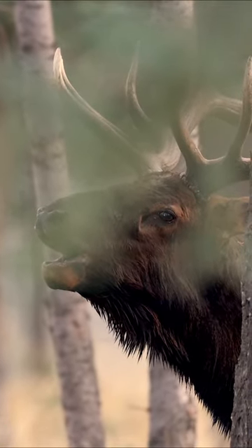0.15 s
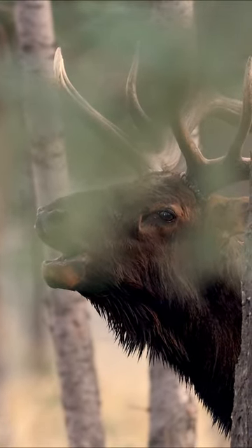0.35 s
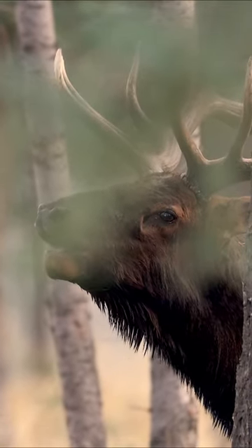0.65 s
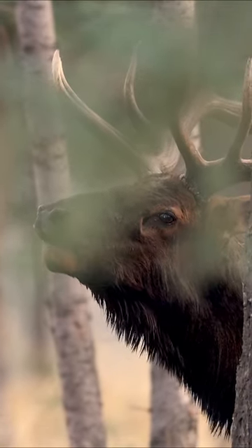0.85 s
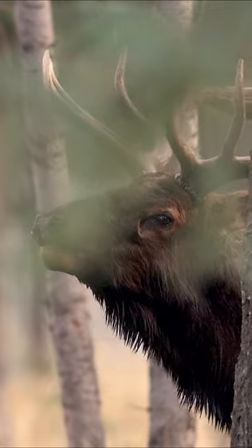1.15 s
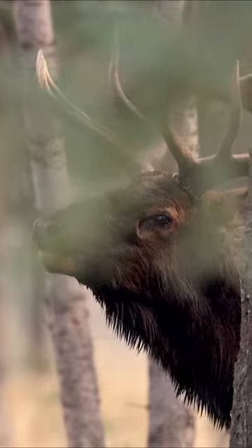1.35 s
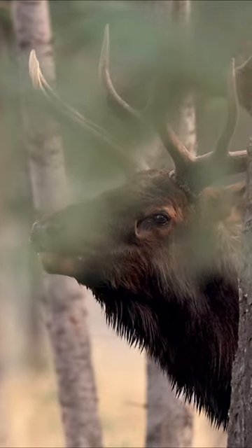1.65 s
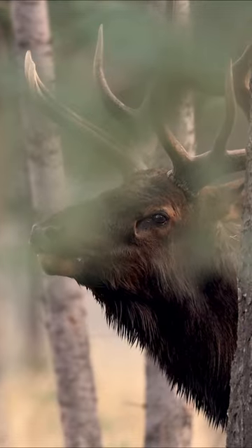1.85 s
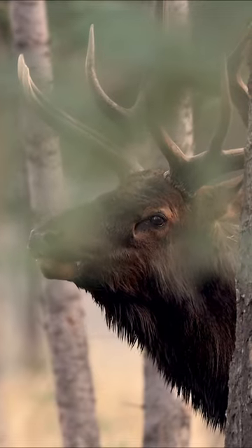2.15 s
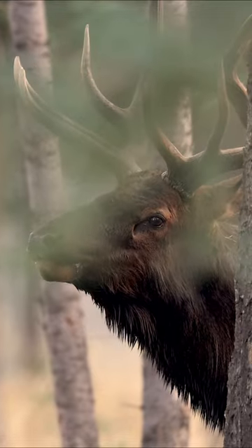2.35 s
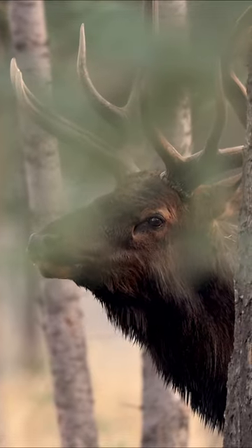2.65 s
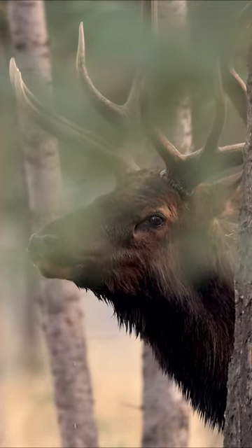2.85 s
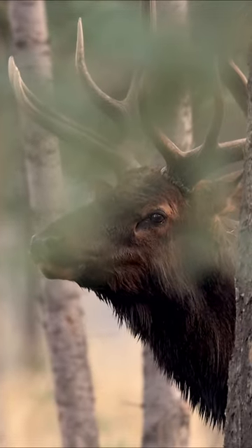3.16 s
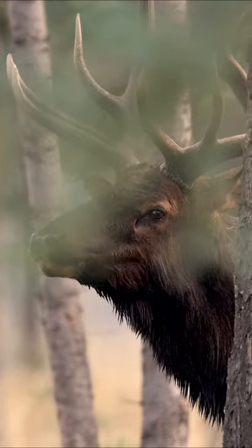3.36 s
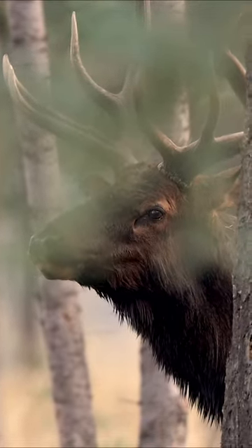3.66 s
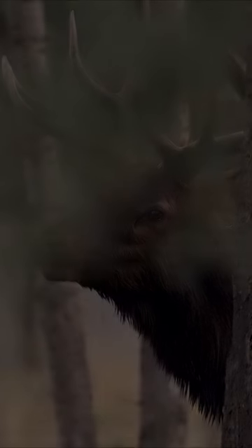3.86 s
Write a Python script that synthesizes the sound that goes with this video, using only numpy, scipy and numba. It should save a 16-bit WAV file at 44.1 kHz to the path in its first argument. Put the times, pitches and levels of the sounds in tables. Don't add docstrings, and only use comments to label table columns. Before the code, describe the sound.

Elk bugling: a near whistle drops and breaks off, then a distant call climbs into a rough scream.

```python
import sys
import numpy as np
from scipy import signal
from scipy.io import wavfile
from scipy.ndimage import uniform_filter1d
from numba import njit

SR = 44100
rng = np.random.default_rng(int(sys.argv[2]) if len(sys.argv) > 2 else 0)


def digitize_waveform(pressure):
    field = np.atleast_2d(pressure).T
    bounded = np.clip(field, -1, 1)
    quanta = np.round(bounded * 32767).astype(np.int16)
    wavfile.write(sys.argv[1], SR, quanta)


def gain_from_db(level_db):
    decades = np.asarray(level_db, float) / 20
    return 10 ** decades


N = 176400
T = np.arange(N) / SR

# (frequency [Hz], density [dB per Hz])
WIND_COLOUR = [(32, -29.5), (55, 0.5), (110, 1), (700, -8), (1250, -15), (2100, -28), (4100, -33),
               (5200, -77)]
# (time [s], level [dB], extra treble [dB])
GUSTS = [(0, 2.5, 0.5), (.6, 0.2, 3), (1.1, 0.5, 0.5), (1.5, 0, -1.5), (2.5, -.5, -1.5), (3.1, 0, -1.5),
         (3.6, 0, -3), (4, -0.5, 3)]
WIND_DB, SWELL_DB, HISS_DB = -46.5, 0.5, -74

# (time [s], pitch [Hz], level [dB])
DRONE_NOTE = [
    (0, 104.5, -59.5),
    (.7, 103, -47.5),
    (1.1, 97.9, -50),
    (1.5, 93.25, -49.5),
    (2, 90, -48.5),
    (3, 93.5, -51.5),
    (3.5, 83.7, -54.5),
    (4, 80.27, -52.5),
]
DRONE_WIDTH_HZ, DRONE_NOISE, DRONE_FLUTTER_DB = 7.9, 0.3, 1.5
HUM_HZ, HUM_WIDTH_HZ, HUM_DB = 127.6, 4.1, -57.5

# (time [s], pitch [Hz], level [dB], octave relative to it [dB])
CHEST = [(0, 152.2, -27.5, -10), (.08, 148.2, -32, -18), (.15, 142.2, -35.5, -7), (.2, 139, -44.5, 7),
         (.25, 134.4, -47.5, 11.5), (.285, 135.8, -49.5, 8), (.32, 133.8, -71.5, 9),
         (.34, 133.6, -86, -5.5)]
# (time [s], pitch [Hz], level [dB], lower sideband [dB], upper sideband [dB])
NEAR_HIGH = [(0, 1850, -31, -2.5, -15), (.02, 1680, -28, -9.5, -18.5), (.03, 1788, -37.5, 1.5, -9.5),
             (.05, 1680, -43.5, 1, -7.5), (.09, 1670, -57, -10, -2.5)]
# (time [s], pitch [Hz], level [dB], lower sideband [dB], upper sideband [dB])
NEAR_FALL = [
    (.05, 1449, -50.5, 4, -13),
    (.072, 1323, -36, -1, -17),
    (.1, 1213, -31.5, -8.5, -17.5),
    (.15, 1150, -28, -8, -15),
    (.19, 1029, -27.5, -1.5, -14),
    (.255, 955.7, -21, -13, -23),
    (.275, 883, -22, -24.5, -36.5),
    (.298, 824, -17.5, -20.5, -23.5),
    (.312, 823, -35, -29.5, -2.5),
]
# (time [s], level [dB])
NEAR_BREATH = [(0, -46), (.08, -43), (.2, -49), (.3, -48.5), (.325, -37.5), (.348, -32.5), (.356, -47),
               (.41, -57)]
# (frequency [Hz], width [Hz], level [dB])
NEAR_THROAT = [(486, 120, -6), (621, 85, -0.5), (883, 120, -1), (913, 120, -2), (1262, 78, -13),
               (1765, 79, -3.5), (2108, 45, -3), (2258, 160, -3), (3460, 270, -24.5), (6300, 900, -32.5)]
# (time [s], pitch [Hz], level [dB])
NEAR_BREAK = [(.3, 825, -41), (0.317, 712, -31), (0.331, 639, -33.5), (.346, 628, -34.5),
              (.356, 640, -45.5), (0.373, 705, -44)]
# (time [s], pitch [Hz], level [dB])
NEAR_RING = [(.318, 851.5, -43), (.33, 890, -35.5), (.348, 900, -33.5), (.356, 900, -46), (.38, 864, -55)]
# (time [s], pitch [Hz], level [dB])
GRUNT = [
    (.33, 560, -60),
    (.342, 476, -31),
    (.354, 340, -49),
    (.366, 227, -46.5),
    (.385, 170.4, -50.5),
]
HIGH_FLUTTER_DB, BREAK_OCTAVE_DB = 2.0, -19.5
HAZE_DB, HAZE_FADE_DB_PER_S = -39.5, 39.5

# (time [s], pitch [Hz], level [dB], octave relative to it [dB])
FAR_CLIMB = [
    (2.68, 890, -68, -31),
    (2.74, 898.5, -54.5, -31),
    (2.765, 987, -54, -26),
    (2.805, 976, -74, -26),
    (2.822, 1457, -53, -30.5),
    (2.842, 1470, -53.5, -31),
    (2.852, 1714, -57, -25),
    (2.876, 1803, -48, -26),
    (2.9, 1780, -70, -30),
]
# (time [s], pitch [Hz], level [dB], octave relative to it [dB])
FAR_HOLD = [(2.9, 1980, -69, 0), (2.93, 2048, -56.5, -20), (2.985, 2030, -51, -15.5),
            (3.055, 2061, -54, -7), (3.085, 2031, -65.5, -5), (3.13, 2024, -59.5, 5),
            (3.165, 2010, -55, -10), (3.225, 2015, -55.5, -14.5), (3.3, 2015, -74, -9)]
# (time [s], upper line [dB], lower line [dB], octave upper line [dB], octave lower line [dB])
FAR_SIDES = [(3.085, -73, -70, -83, -75), (3.1, -65, -63, -82, -71), (3.15, -59.5, -67, -73, -74),
             (3.19, -63.5, -69, -77, -71), (3.28, -71, -70.5, -85, -73.5)]
FAR_SIDE_HZ = 209

# (time [s], throb rate [Hz], level [dB], upper resonances [dB])
SCREAM = [(3.163, 94.95, -75, -8.5), (3.176, 94.64, -33.5, -10.5), (3.255, 90.15, -38, -1.5),
          (3.275, 86, -35.5, -2), (3.5, 82.6, -36, -3.5), (3.55, 84.7, -39.5, -0.5), (3.7, 87.94, -36.5, 4),
          (3.74, 88, -41.5, 5.5), (4, 91.1, -42, 3)]
# (time [s], peak level [dB])
THROBS = [(3.1779, -36.5), (3.187, -30), (3.1948, -31), (3.2117, -30), (3.2395, -35.5), (3.27, -27.5),
          (3.2918, -28.5), (3.3259, -26), (3.338, -26.5), (3.347, -26), (3.3624, -28.5), (3.3725, -27),
          (3.3983, -25.5), (3.4217, -26.5), (3.4335, -27), (3.4583, -29), (3.484, -26.5), (3.4934, -25),
          (3.519, -28), (3.5436, -29.5), (3.566, -27), (3.577, -32), (3.6018, -26.5), (3.6482, -31.5),
          (3.6737, -28), (3.693, -29), (3.7143, -34), (3.7402, -35.5), (3.7724, -34.5), (3.7942, -31.5),
          (3.8179, -37), (3.8292, -34), (3.8536, -37.5), (3.8864, -37), (3.8965, -32.5), (3.9273, -35.5),
          (3.9487, -31), (3.9716, -33), (3.9844, -31)]
# (time [s], depth [0-1], phase flip per throb [half turns])
CHOKE = [(3.16, 0.8, 0.099), (3.25, 0.5, 0), (3.27, 0.84, 0.75), (3.31, 0.7, .8), (3.33, 0.97, 0.0056),
         (3.38, 0.97, 0.024), (3.4, 0.93, 0.99), (3.46, 0.6, 0.93), (3.475, 0.84, 0.0084),
         (3.51, 0.65, 0.025), (3.55, 1, 0.816), (3.62, 1, 0.34), (3.75, 0.8, .1), (4, 0.9, .2)]
# (frequency [Hz], width [Hz], level [dB])
FAR_THROAT = [(1422, 32, -18), (1715, 100, -5.5), (1920, 77, -16), (2102, 120, -6), (2308, 104, -14),
              (2380, 140, -19)]
# (frequency [Hz], width [Hz], level [dB])
FAR_RASP = [(900, 200, -20.5), (3196, 260, -31), (3910, 390, -32)]
THROB_LEAD_S = 0.002
WEAK_THROB_DB, SCREAM_SHIMMER_DB = 5, 1.5
SCREAM_HZ, SCREAM_WOBBLE = 1742, 0.0039
SCREAM_SLIP = 0.57
SCREAM_NOISE, RING_WANDER_DB, FAR_EDGE_HZ = 1.5, 1.0, 2340
RASP_SHIFT_DB_PER_S = 12.5

# (time [s], pitch [Hz], level [dB])
FAR_CHEST = [
    (3.78, 263, -66),
    (3.85, 273.8, -50.5),
    (4, 257, -61),
]
# (time [s], pitch [Hz], level [dB])
FAR_CHEST_OCTAVE = [
    (3.74, 532.4, -68),
    (3.84, 538, -54.5),
    (4, 546.6, -61),
]

WOOD_T60_S, WOOD_DB, WOOD_DELAY_S, WOOD_HZ = 0.31, -17.5, 0.02, 4550
FAR_WOOD_DB = -12
TOP_HZ = 15700


def level(x):
    return x / np.sqrt(np.mean(x ** 2))


def columns(rows):
    a = np.array(rows, float)
    inside = 1. * ((T >= a[0, 0]) & (T <= a[-1, 0]))
    gate = uniform_filter1d(inside, size=129, mode="nearest")
    curves = [uniform_filter1d(np.interp(T, a[:, 0], c), size=257, mode="nearest") for c in a.T[1:]]
    return curves + [gate]


@njit
def svf(x, hz, width):
    y, b, l = np.empty(len(x)), 0., 0.
    for i in range(len(x)):
        g, k = np.tan(np.pi * hz[i] / SR), width / hz[i]
        v = (b + g * (x[i] - l)) / (1 + g * (g + k))
        b, l, y[i] = 2 * v - b, l + 2 * g * v, k * v
    return y


def band(x, hz, width_hz):
    hz = hz + np.zeros(N)
    once = svf(x, hz, 1. * width_hz)
    return svf(once, hz, 1. * width_hz)


def noise():
    return rng.standard_normal(N)


def walk(rate):
    k = int(SR / rate)
    steps = np.repeat(rng.standard_normal(N // k + 1), k)
    return level(uniform_filter1d(uniform_filter1d(steps, k), k)[:N])


def phase(hz):
    return 2 * np.pi * np.cumsum(hz) / SR


def tone(rows, wobble, flutter_db):
    hz, db, gate = columns(rows)
    loud = gate * gain_from_db(db + flutter_db * walk(90))
    return 2 ** .5 * loud * np.sin(phase(hz * (1 + wobble * walk(80))))


def wind():
    out, swell, colour = 0, walk(0.75), np.array(WIND_COLOUR)
    gust_db, bright_db, _ = columns(GUSTS)
    for hz in 30 * 2 ** np.arange(0, 7.6, 1 / 3):
        db = np.interp(np.log(hz), np.log(colour[:, 0]), colour[:, 1])
        db = db + gust_db + bright_db * np.clip(np.log2(hz / 1100), 0, 1)
        db = db + SWELL_DB * swell + 1.0 * walk(6)
        out = out + gain_from_db(db) * band(noise(), hz, hz / 2.58)
    return level(out) * gain_from_db(WIND_DB)


def drone():
    hz, db, _ = columns(DRONE_NOTE)
    note = 2 ** .5 * np.sin(phase(hz * (1 + .01 * walk(4.93)))) * gain_from_db(DRONE_FLUTTER_DB * walk(6))
    blur = DRONE_NOISE * level(band(noise(), hz, DRONE_WIDTH_HZ))
    hum = gain_from_db(HUM_DB) * level(band(noise(), HUM_HZ, HUM_WIDTH_HZ))
    return gain_from_db(db) * (note + blur) + hum


def near_whistle(rows, low, flutter_db, octave_db):
    hz, db, under_db, over_db, gate = columns(rows)
    high = phase(hz * (1 + 0.0033 * walk(70)))
    x = np.sin(high)
    x = x + gain_from_db(under_db + 1.1 * walk(63)) * np.sin(high - low)
    x = x + gain_from_db(over_db) * np.sin(high + low)
    x = x + gain_from_db(under_db - 25.5) * np.sin(high - 2 * low)
    loud = gate * gain_from_db(db + flutter_db * walk(70))
    octave = loud * (np.sin(2 * high) + gain_from_db(under_db) * np.sin(2 * high - low))
    throat = sum(band(octave, f, w) for f, w in ((1750, 64), (2110, 140), (2320, 98)))
    return x * loud + gain_from_db(octave_db) * throat


def near_breath(low):
    db, gate = columns(NEAR_BREATH)
    air = noise() * (1 + 0.89 * np.sin(low))
    haze = gain_from_db(HAZE_DB - HAZE_FADE_DB_PER_S * np.clip(T - .2, 0, None) - 29 * T)
    breath = 0
    for f, w, ring_db in NEAR_THROAT:
        loud = haze if f > 1500 else gain_from_db(db) * gate
        breath = breath + gain_from_db(ring_db - 5.5) * level(band(air, f, 1.1 * w)) * loud
    return breath


def near_bull():
    hz, db, octave_db, gate = columns(CHEST)
    low = phase(hz * (1 + 0.0047 * walk(40))) + 1.1
    chest = gate * gain_from_db(db) * (np.sin(low) + gain_from_db(octave_db) * np.sin(2 * low + 0.55))
    whistle = near_whistle(NEAR_HIGH, low, flutter_db=HIGH_FLUTTER_DB, octave_db=-38.5)
    whistle = whistle + near_whistle(NEAR_FALL, low, flutter_db=1.3, octave_db=-21)
    octave_rows = [(s, 2 * f, d + BREAK_OCTAVE_DB) for s, f, d in NEAR_BREAK]
    collapse = tone(NEAR_BREAK, 0.014, 2.5) + band(tone(octave_rows, 0.011, 1.5), 1280, 150)
    ending = collapse + tone(NEAR_RING, .025, 3) + tone(GRUNT, 0.0193, 2.4)
    return 2 ** .5 * (chest + whistle) + near_breath(low) + ending


def far_whistle(rows):
    hz, db, octave_db, gate = columns(rows)
    high = phase(hz * (1 + 0.0012 * walk(40)))
    low = phase(FAR_SIDE_HZ * (1 + 0.043 * walk(36)))
    whistle = (np.sin(high) + gain_from_db(octave_db) * np.sin(2 * high)) * gain_from_db(db + 1.0 * walk(34.9))
    *side_db, side_gate = columns(FAR_SIDES)
    lines = (high + low, high - low, 2 * high + low, 2 * high - low)
    sides = sum(gain_from_db(d + 2.7 * walk(60)) * np.sin(p) for d, p in zip(side_db, lines))
    return 2 ** .5 * (whistle + side_gate * sides) * gate


def throbs():
    rate, db = columns(SCREAM)[:2]
    a = np.array(THROBS)
    times = np.r_[0, a[:, 0] - THROB_LEAD_S, 1.02 * T[-1]]
    middle = np.minimum((times[1:] + times[:-1]) / 2 * SR, N - 1).astype(int)
    counts = np.maximum(np.round(np.diff(times) * rate[middle]), 1)
    marks = np.r_[0, np.cumsum(counts)].astype(int)
    size_db = WEAK_THROB_DB + SCREAM_SHIMMER_DB * rng.standard_normal(1000)
    size_db[marks[1:-1]] = a[:, 1] - db[(a[:, 0] * SR).astype(int) + 200]
    return np.interp(T, times, marks), size_db


def far_scream():
    _, db, upper_db, gate = columns(SCREAM)
    cycle, size_db = throbs()
    depth, flip, _ = columns(CHOKE)
    k, depth, within = cycle.astype(int), np.clip(depth, 0, 1), cycle % 1
    size = uniform_filter1d(gain_from_db(size_db[k]), size=45)

    jump = np.pi * flip + SCREAM_SLIP * rng.standard_normal(1000)[k]
    slip = uniform_filter1d(np.cumsum(np.diff(k, prepend=0) * jump), size=65)
    opening = 1 - depth + depth * np.sin(np.pi * within ** 0.55)
    whistle = size * opening * np.sin(phase(SCREAM_HZ * (1 + SCREAM_WOBBLE * walk(8))) + slip)

    pulses = level(np.diff(np.floor(cycle), prepend=0) * size)
    air = level(noise() * size * np.exp(-within / .5))
    drive, drift = pulses + SCREAM_NOISE * air, 1 + 0.004 * walk(10)
    rings = 0
    for f, w, d in FAR_THROAT:
        ring_db = d + RING_WANDER_DB * walk(14) + (f > 1900) * upper_db
        rings = rings + gain_from_db(ring_db) * level(band(drive, f * drift, 1.09 * w))
    edge = signal.cheby1(6, 1, FAR_EDGE_HZ, fs=SR, output="sos")
    throat = signal.sosfilt(edge, level(whistle) + rings)

    rasp = 0
    for f, w, d in FAR_RASP:
        rasp_db = d + np.sign(3500 - f) * RASP_SHIFT_DB_PER_S * (T - 3.5)
        rasp = rasp + gain_from_db(rasp_db) * level(band(0.45 * air + noise(), f, w))
    return level(throat + rasp) * gain_from_db(db) * gate


def woods(x):
    t = T[:SR // 2]
    tail = rng.standard_normal(len(t)) * gain_from_db(-60 * t / WOOD_T60_S) * (t > WOOD_DELAY_S)
    tail = signal.sosfilt(signal.butter(2, [400, WOOD_HZ], "band", fs=SR, output="sos"), tail)
    return gain_from_db(WOOD_DB) * signal.fftconvolve(x, tail / np.sqrt(np.sum(tail ** 2)))[:N]


def scene():
    far = far_whistle(FAR_CLIMB) + far_whistle(FAR_HOLD)
    far_chest = tone(FAR_CHEST, .01, 1.3) + tone(FAR_CHEST_OCTAVE, .01, 1.5)
    calls = near_bull() + far + far_scream() + far_chest
    echo = woods(calls) + woods(far) * gain_from_db(FAR_WOOD_DB - WOOD_DB)
    return (calls + echo + wind() + drone())[None]


def band_limit(x):
    return signal.sosfilt(signal.butter(12, 15719, fs=SR, output="sos"), x)


def record(dry):
    hiss_filter = signal.butter(2, 2500, "high", fs=SR, output="sos")
    hiss = signal.sosfilt(hiss_filter, rng.standard_normal(dry.shape))
    top_cut = signal.ellip(8, .2, 70, TOP_HZ, fs=SR, output="sos")
    mix = signal.sosfilt(top_cut, dry + gain_from_db(HISS_DB) * hiss)
    return band_limit(mix)


dry = scene()
out = record(dry)
digitize_waveform(out)
```